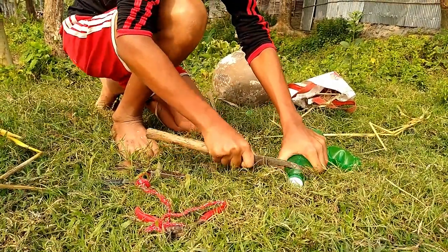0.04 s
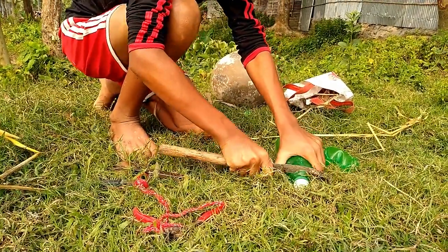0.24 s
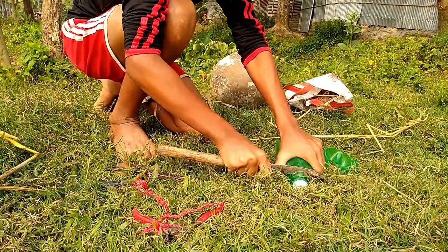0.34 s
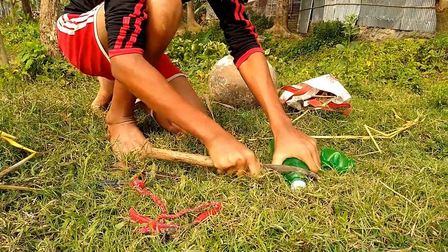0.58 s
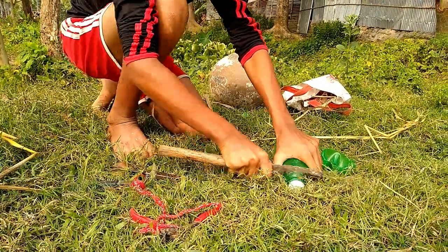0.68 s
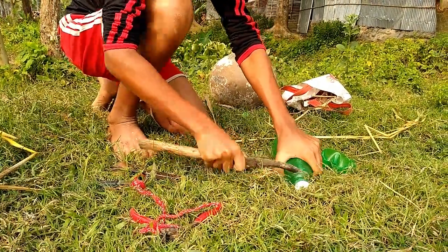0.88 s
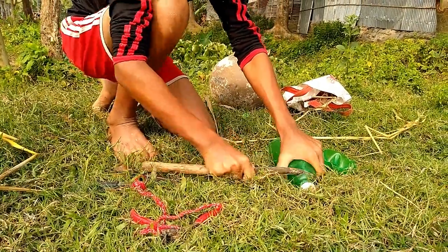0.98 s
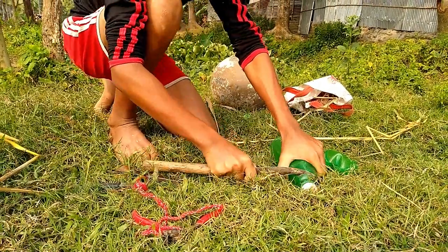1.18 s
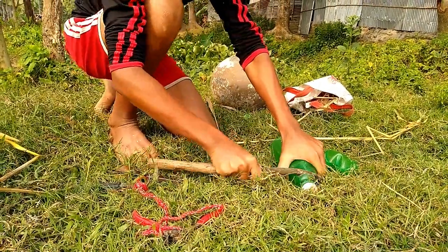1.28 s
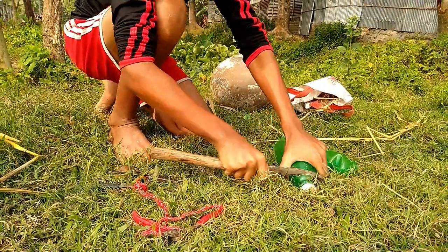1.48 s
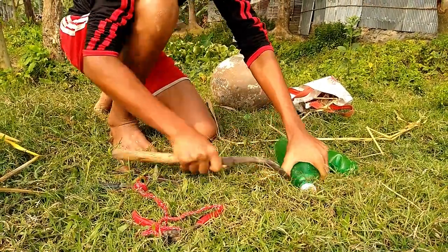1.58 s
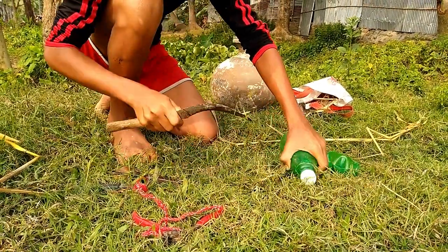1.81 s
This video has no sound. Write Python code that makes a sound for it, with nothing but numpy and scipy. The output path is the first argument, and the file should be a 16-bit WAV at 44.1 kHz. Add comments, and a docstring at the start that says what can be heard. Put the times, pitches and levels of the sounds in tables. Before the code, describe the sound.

Close sawing on a thin plastic bottle outdoors: quick, gritty strokes crackle as the plastic splits, with a hollow note creeping upward. After a brief gap with a few clicks, two more strokes finish the run.

```python
"""A curved blade saws through a plastic bottle held down on grass, in short raspy strokes.
The edge slips thousands of times a second and now and then snaps through; the thin wall rings and
buckles once. The bottle's hollow note climbs unevenly as the cut opens. Hard strokes press it
into the ground. Behind it: a faint yard echo and still outdoor air."""
import sys
import numpy as np
from scipy import signal
from scipy.fft import rfft, irfft, next_fast_len
from scipy.io import wavfile
from scipy.ndimage import uniform_filter1d

SR = 44100
rng = np.random.default_rng(int(sys.argv[2]) if len(sys.argv) > 2 else 0)


def output_pcm(signal):
    """Save a mono or channel-first signal as 16-bit PCM at the path in sys.argv[1].

    Samples are clipped to [-1, 1] before scaling.
    """
    pcm = np.clip(np.atleast_2d(signal).T, -1, 1) * 32767
    wavfile.write(sys.argv[1], SR, np.round(pcm).astype(np.int16))


N = 81585
T = np.arange(N) / SR
FFT_SIZE = next_fast_len(2 * N)
HZ = np.maximum(np.arange(FFT_SIZE // 2 + 1) * SR / FFT_SIZE, 1)

# envelopes, one list per stroke: t/s, relative levels of rasp/dB, wall/dB, hollow note/dB
STROKES = [
    [(0.045, -80, -88, -92), (0.075, -57, -73, -77), (0.106, -44, -51, -59), (0.11, -29.5, -39, -33.5),
     (0.143, -29.5, -33, -30), (0.16, -25, -32.5, -30), (0.182, -37.5, -39, -44), (0.2, -47, -57, -58)],
    [(0.289, -42, -58.5, -64), (0.297, -34, -34.5, -48), (0.315, -24.5, -36.5, -35),
     (0.335, -19.5, -23, -30.5), (0.363, -17, -23.5, -26), (0.375, -19.5, -20.5, -23),
     (0.386, -36, -37, -49.5)],
    [(0.388, -35, -53.5, -38), (0.402, -41.5, -48, -44.5), (0.436, -28.5, -36.5, -47),
     (0.448, -43.5, -51.5, -52.5), (0.478, -45, -58, -62.5), (0.488, -63, -70, -62)],
    [(0.502, -16, -42.5, -37.5), (0.512, -28, -37, -32), (0.524, -23.5, -37, -28), (0.574, -22, -25, -29.5),
     (0.606, -29, -37, -40.5), (0.626, -46, -61, -53.5)],
    [(0.63, -47.5, -56, -57.5), (0.649, -42.5, -42, -54.5), (0.654, -26, -36, -38.5),
     (0.7, -20, -26.5, -26.5), (0.728, -19.5, -28.5, -23.5), (0.745, -16, -15, -16.5),
     (0.768, -16.5, -23.5, -21.5), (0.778, -14, -25, -13.5), (0.788, -28, -36, -33.5),
     (0.804, -29.5, -38, -52.5), (0.812, -40, -52.5, -52)],
    [(0.82, -18.5, -20, -32), (0.835, -25, -30.5, -19), (0.846, -30.5, -35.5, -35.5),
     (0.862, -37, -49, -46), (0.876, -36.5, -44, -40.5)],
    [(0.883, -22, -23, -40.5), (0.892, -24.5, -30, -46.5), (0.915, -18.5, -18.5, -22.5),
     (0.934, -22, -32, -27), (0.948, -22.5, -22, -28), (0.958, -37.5, -44, -51), (0.965, -36.5, -43.5, -54)],
    [(1.2165, -19, -22.5, -31.5), (1.236, -28, -29, -32), (1.27, -20.5, -20.5, -23.5),
     (1.286, -28, -38.5, -27.5), (1.31, -27.5, -31.5, -40), (1.35, -35, -44.5, -44.5),
     (1.37, -54, -72.5, -71)],
    [(1.37, -46.5, -63, -71), (1.416, -36, -41.5, -39.5), (1.454, -16, -21, -21.5),
     (1.485, -20, -33, -23.5), (1.505, -15, -28, -29), (1.537, -14.5, -23.5, -23.5),
     (1.552, -9.5, -18, -14.5), (1.568, -21.5, -35, -31.5), (1.598, -30.5, -46, -50.5),
     (1.62, -39.5, -59, -48)],
    [(1.62, -38, -60, -53), (1.66, -57, -68, -67.5), (1.73, -57.5, -72, -76), (1.78, -66, -78, -81)],
]
# plastic breaking: t/s, edge drive/dB, wall drive/dB, crumble length/s
SNAPS = [(0.4322, -16, -16.5, 0.0017), (0.4996, 7.5, -0.5, .0017), (0.567, -4.5, -13.5, 0.005),
         (0.7054, 4.5, -12, 0.00046), (0.757, 7.5, 1, .004), (0.7619, 9, 3, 0.0014),
         (0.7724, 0, 3.5, 0.0045), (0.774, -6.5, -4, 0.0044), (0.8199, -13, -0.5, 0.0026),
         (0.8542, -17, -14.5, .002), (0.881, 8.5, -5.5, .004), (0.8939, 10.5, -8.5, 0.0012),
         (0.899, 9, 1, 0.0025), (0.9435, 1, -8, 0.0023), (1.1227, 4, -3.5, 0.0027),
         (1.1485, -8, -1.5, 0.0011), (1.1696, -10.5, -2, 0.001), (1.2154, 4, -1, 0.00049),
         (1.2527, -1, -10.5, .001), (1.2931, 9, -3, .0012), (1.4512, 3, -5, 0.0014),
         (1.4572, 8.5, -20.5, 0.0019), (1.4989, 1.5, -1, 0.0018), (1.5078, 8.5, 0.5, 0.0016),
         (1.519, 7, -0.5, .0015), (1.526, 7, 7.5, 0.0024), (1.54, 0, 8.5, .002), (1.548, -2.5, 3, 0.0014),
         (1.5542, 5, 2, .002), (1.592, 3.5, -15, 0.00079), (1.729, -22, -39, .002)]
# cut edge spectrum: f/Hz, level/dB
EDGE_SHAPE = [(300, -26.5), (1500, -12.5), (2100, -7.5), (2400, 0.5), (3200, -2), (4300, -1.5), (6200, 2.5),
              (8000, 0.5), (9200, 4), (10700, 2.5), (12500, 0), (14200, -4.5), (15500, -26)]
# cut edge resonances: f/Hz, width/Hz, boost/dB
EDGE_MODES = [(2386, 81, 1.8), (2930, 36, 2.4), (3770, 50, 4.1), (4250, 60, 6.3), (4762, 120, 5.6),
              (5200, 34, 2.3), (6504, 63, 5.8), (8740, 100, 4.5), (9410, 70, 6), (10100, 150, 3.5),
              (11213, 52, 6)]
# wall spectrum under slips: f/Hz, level/dB
WALL_SHAPE = [(150, -32.5), (320, -18), (680, -5), (850, 1.5), (1000, -1), (1150, 4), (1400, 1.5),
              (1900, 0.5), (2150, -7.5), (3200, -55)]
# wall resonances under slips: f/Hz, width/Hz, boost/dB
WALL_MODES = [(881, 30, 5), (1204, 45, 7.3), (1270, 49, 11.74), (1585, 110, 5.3), (1830, 22, 9.2),
              (1932, 76, 5.6)]
# wider wall spectrum under snaps: f/Hz, level/dB
KNOCK_SHAPE = [(90, -25), (200, -14), (320, -1.5), (700, -1.5), (950, -7), (1300, 2.5), (1800, -1.5),
               (2150, 0), (2600, -13.5), (3400, -7), (6000, -16)]
# air resonance in the bottle: t/s, f/Hz
HOLLOW_PITCH = [(0.11, 390), (0.16, 438), (0.36, 451), (0.53, 452.5), (0.59, 485.5), (0.72, 439.5),
                (0.83, 481.5), (0.92, 455.5), (1.24, 466.5), (1.3, 495.5), (1.45, 524.5), (1.56, 548)]
# skirts of that resonance: f/Hz, level/dB
HOLLOW_SKIRTS = [(60, -7), (200, -5), (310, 0.5), (480, 2), (700, 4), (1100, -10.5), (3000, -38)]
# pushes into the ground: t/s, level/dB
PUSHES = [(0.756, -51.5), (0.778, -32), (0.883, -43), (0.9, -50), (0.96, -51.5), (1.527, -54.5),
          (1.555, -34.5)]
# turf thud spectrum: f/Hz, level/dB
THUD_SHAPE = [(20, -29), (50, -1.5), (80, -8), (150, -6), (260, -12.5), (600, -34.5)]
# stereo image: f/Hz, scattered share/0-1, left lead/rad, left minus right/dB
STEREO_IMAGE = [(300, 0, 0.5, 1.5), (1350, 0.19, 0.14, -.7), (1900, 0.24, 1.18, 2.5),
                (2530, 0.28, 0.5, 1.9), (3620, 0.63, 1.42, 2.2), (5500, 0.4, 0.5, 2), (7300, 0.4, 4, -1.5),
                (8440, 0, 4, -6), (9700, 0.9, 4, -0.5), (10300, 0, 5.5, 1.5), (12800, .4, 3.5, 8),
                (15500, .5, 7.5, 5)]
# yard echo spectrum: f/Hz, level/dB
ECHO_SHAPE = [(150, -4), (500, -11), (800, 0), (1300, -8.5), (3000, -2), (6000, 0.5), (10000, 0.5),
              (15000, -5.5)]
# outdoor air spectrum: f/Hz, level/dB
AIR_SHAPE = [(20, -16.5), (60, 1), (130, -1), (250, -15.5), (700, -23.5), (3000, -23), (8000, -24),
             (15000, -33)]

SLIPS_PER_S, SLIP_SPREAD_DB, JUDDER_HZ, JUDDER_DB = 11000, 0.5, 159, 0.77
RASP_GAIN_DB, HOLLOW_GAIN_DB, HOLLOW_WIDTH_HZ, RELEASE_S = 1.5, -2, 56, 0.0024
SNAP_GAIN_DB, SNAP_HOLLOW_DB, SNAP_BOOST_SCALE = -0.5, -18, 0.55
CRUMBLE_GAIN, CRUMBLE_FULL_S = 0.25, 0.005
FULL_EFFORT_DB, CRACKLES_PER_S, CRACKLE_DRIVE_DB = -15, 170, -2
BUCKLE_AT_S, BUCKLE_SIGMA_S, BUCKLE_DB, BUCKLE_HZ, BUCKLE_WIDTH_HZ = 0.823, 0.0068, -18.5, 2480, 600
RUB_GAIN_DB, PUSH_SIGMA_S = -42.5, 0.008
ECHO_DB, AIR_GAIN_DB = -21.5, -73.5


def sawing(drive, rasp_gain, wall_gain, hollow_gain):
    """Slips excite the cut edge, the thin wall and the air inside."""
    rasp = filtered(two_sided(drive, stray=0.38), body(EDGE_SHAPE, EDGE_MODES))
    ring = filtered(two_sided(drive, stray=0.08), body(WALL_SHAPE, WALL_MODES))
    return (from_db(RASP_GAIN_DB) * rasp_gain * unit_rms(rasp, window_s=0.011)
            + wall_gain * unit_rms(ring, window_s=0.0093)
            + from_db(HOLLOW_GAIN_DB) * hollow_gain * unit_rms(hollow(drive), window_s=0.019))


def slips():
    """Tiny random slips of the edge; blade judder modulates their size."""
    judder = signal.sosfilt(signal.butter(2, JUDDER_HZ, fs=SR, output="sos"), rng.standard_normal(N))
    spread_db = SLIP_SPREAD_DB * np.minimum(rng.exponential(1, N), 4)
    sizes = from_db(spread_db + JUDDER_DB * judder / judder.std())
    return sizes * rng.choice([-1, 1], N) * (rng.random(N) < SLIPS_PER_S / SR)


def stroke_gains():
    """Rasp, wall and hollow gains: the blade bites at once and lets go quickly."""
    gains = np.zeros((3, N))
    for stroke in STROKES:
        times_s, *levels_db = np.transpose(stroke)
        gate = (T >= times_s[0]) * np.exp(-np.maximum(T - times_s[-1], 0) / RELEASE_S)
        gains = np.maximum(gains, [gate * from_db(np.interp(T, times_s, db)) for db in levels_db])
    return gains


def hollow(drive):
    """Air in the bottle: one resonance, climbing unevenly as the cut opens."""
    pitch_hz = np.interp(T, *np.transpose(HOLLOW_PITCH))
    carrier = np.exp(2j * np.pi * np.cumsum(pitch_hz) / SR)
    pole = np.exp(-np.pi * HOLLOW_WIDTH_HZ / SR)
    baseband = signal.lfilter([np.sqrt(2 * (1 - pole ** 2))], [1, -pole], drive / carrier + 1e-18)
    skirts = body(HOLLOW_SKIRTS)
    return filtered((baseband * carrier).real, skirts / np.abs(skirts).max())


def snap_drives():
    """Edge and wall drive per snap: one impulse plus a crumble, weaker when shorter."""
    crack, knock = np.zeros((2, N)), np.zeros(N)
    age_s, grain = T[:SR // 50], rng.standard_normal(N)
    stereo_grain = two_sided(grain, stray=0.38)
    impulse = age_s == 0
    for at_s, edge_db, wall_db, crumble_s in SNAPS:
        span = slice(int(at_s * SR), int(at_s * SR) + len(age_s))
        crumble = CRUMBLE_GAIN * np.sqrt(crumble_s / CRUMBLE_FULL_S) * gaussian(age_s, crumble_s)
        crack[:, span] += from_db(edge_db) * (impulse + crumble * stereo_grain[:, span])
        knock[span] += from_db(wall_db) * (impulse + crumble * grain[span])
    return crack, knock


def snapping(crack, knock, effort):
    """Breaks excite edge, wall and inner air; the pressed wall rings less."""
    edge = filtered(crack + crackles(effort), body(EDGE_SHAPE, EDGE_MODES))
    pressed_modes = [(hz, width_hz, db * SNAP_BOOST_SCALE) for hz, width_hz, db in WALL_MODES]
    wall = filtered(knock, body(KNOCK_SHAPE, pressed_modes))
    return from_db(SNAP_GAIN_DB) * (edge + wall + from_db(SNAP_HOLLOW_DB) * hollow(knock))


def crackles(effort):
    """Small random breaks; rate and size grow with effort."""
    load = np.minimum(effort / from_db(FULL_EFFORT_DB), 1)
    breaks = rng.random(N) < CRACKLES_PER_S * load ** 2 / SR
    return breaks * load * from_db(CRACKLE_DRIVE_DB) * rng.choice([-1, 1], N)


def buckle():
    """The wall buckles with a bright creak: a burst of slips in one high resonance."""
    band = 1 / (1 + 2j * (HZ - BUCKLE_HZ) / BUCKLE_WIDTH_HZ) ** 2
    creak = unit_rms(filtered(slips(), band), window_s=0.01)
    return from_db(BUCKLE_DB) * gaussian(T - BUCKLE_AT_S, BUCKLE_SIGMA_S) * creak


def ground(effort):
    """Dull thuds and a low rub where the bottle bears on the turf."""
    pushes = sum(from_db(db) * gaussian(T - at_s, PUSH_SIGMA_S) for at_s, db in PUSHES)
    turf = filtered(two_sided(rng.standard_normal(N), stray=0.25), body(THUD_SHAPE))
    return (pushes + from_db(RUB_GAIN_DB) * effort) * unit_rms(turf, window_s=0.02)


def yard_echo(x):
    """Faint, short reflections from the yard."""
    return from_db(ECHO_DB) * filtered(x, reflections(t60_s=0.33, onset_s=0.0078) * body(ECHO_SHAPE))


def outdoor_air():
    """Steady low rumble and hiss, half common to both sides."""
    noise = rng.standard_normal((2, N)) + rng.standard_normal(N)
    return from_db(AIR_GAIN_DB) * filtered(noise, body(AIR_SHAPE))


def stereo_spread(x):
    """Bass is near alike on both sides; treble scatters and differs in phase and level."""
    share, lead_rad, balance_db = over_hz(STEREO_IMAGE)
    side = np.array([[0.5], [-0.5]])
    direct = np.sqrt(1 - share) * np.exp(1j * side * lead_rad)
    scattered = np.sqrt(share) * reflections(t60_s=0.012, onset_s=0.0004)
    return filtered(x, from_db(side * balance_db) * (direct + scattered))


def two_sided(drive, stray):
    """Uneven radiation to left and right; stray is the uncorrelated power share."""
    return drive * (np.sqrt(1 - stray) + np.sqrt(stray) * rng.choice([-1, 1], (2, N)))


def reflections(t60_s, onset_s):
    """Unit-power stereo response of dense, decaying reflections."""
    onset = 1 - np.exp(-(T / onset_s) ** 2)
    tail = rng.standard_normal((2, N)) * from_db(-60 * T / t60_s) * onset
    return rfft(tail / np.sqrt(np.sum(tail ** 2, axis=1, keepdims=True)), FFT_SIZE)


def body(shape, modes=()):
    """Unit-power, minimum-phase response: broad shape plus resonances."""
    gain = from_db(over_hz(shape)[0])
    for hz, width_hz, boost_db in modes:
        peak = 1 / (1 + (2 * (HZ - hz) / width_hz) ** 2)
        gain *= np.sqrt(1 + (from_db(boost_db) ** 2 - 1) * peak)
    cepstrum = irfft(np.log(gain / np.sqrt(np.mean(gain ** 2))), FFT_SIZE)
    return np.exp(rfft(np.r_[cepstrum[0], 2 * cepstrum[1:FFT_SIZE // 2]], FFT_SIZE))


def over_hz(rows):
    """Table columns interpolated over log frequency."""
    hz, *columns = np.transpose(rows)
    return [np.interp(np.log(HZ), np.log(hz), column) for column in columns]


def filtered(x, response):
    """Apply a frequency response."""
    return irfft(rfft(x, FFT_SIZE) * response, FFT_SIZE)[..., :N]


def unit_rms(x, window_s):
    """Hold running RMS at 1; grit faster than the window stays."""
    size = int(window_s * SR)
    power = uniform_filter1d(uniform_filter1d(x * x, size), size)
    return x / np.sqrt(np.abs(power) + 1e-12)


def gaussian(t_s, sigma_s):
    """Bell curve, peak 1."""
    return np.exp(-0.5 * (t_s / sigma_s) ** 2)


def from_db(db):
    """Decibels to gain."""
    return 10 ** (np.asarray(db) / 20)


def scene():
    """Sawn bottle, yard echo, outdoor air."""
    rasp_gain, wall_gain, hollow_gain = stroke_gains()
    drive = slips()
    crack, knock = snap_drives()
    bottle = sawing(drive, rasp_gain, wall_gain, hollow_gain)
    bottle += snapping(crack, knock, effort=rasp_gain) + ground(effort=rasp_gain) + buckle()
    background = yard_echo(bottle) + outdoor_air()
    return stereo_spread(bottle) + background


def record(dry):
    """Soft clip, then low-pass."""
    ceiling, cutoff_hz = 1.4, 15700
    lowpass = signal.ellip(10, 0.2, 70, cutoff_hz, fs=SR, output="sos")
    return signal.sosfilt(lowpass, ceiling * np.tanh(dry / ceiling))


dry = scene()
out = record(dry)
output_pcm(out)
```